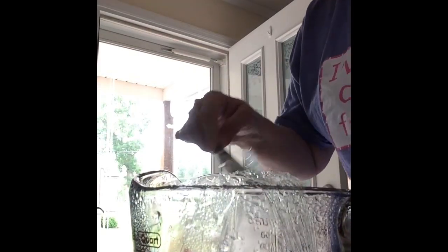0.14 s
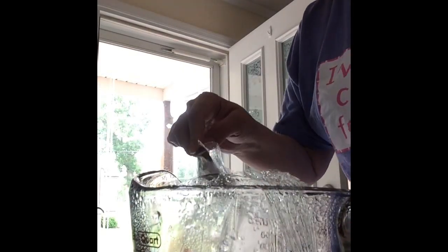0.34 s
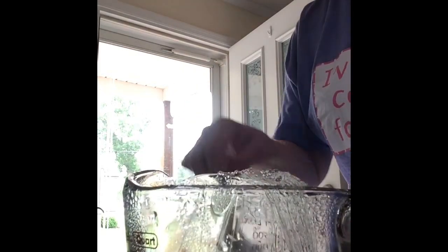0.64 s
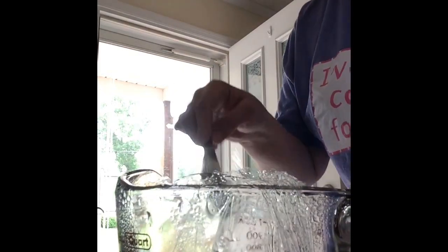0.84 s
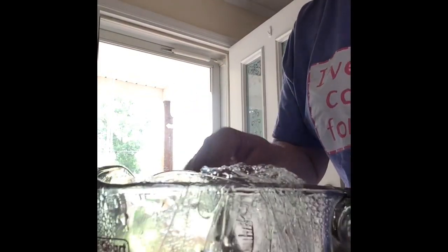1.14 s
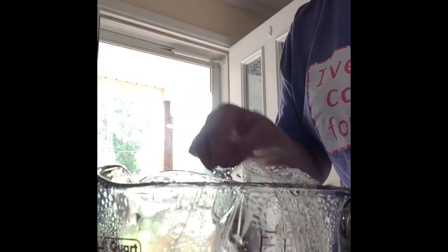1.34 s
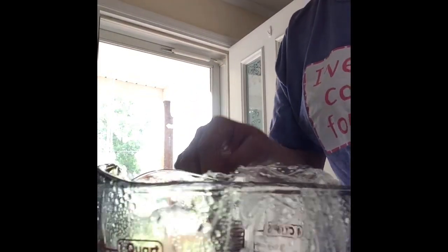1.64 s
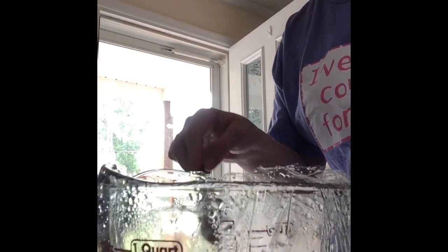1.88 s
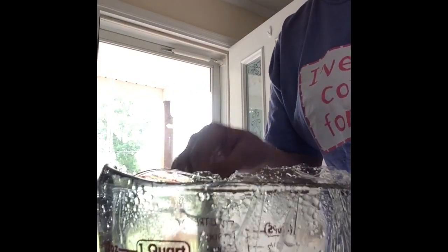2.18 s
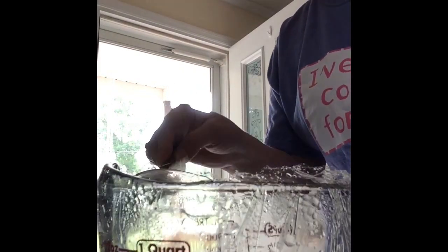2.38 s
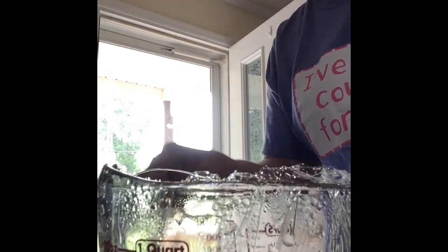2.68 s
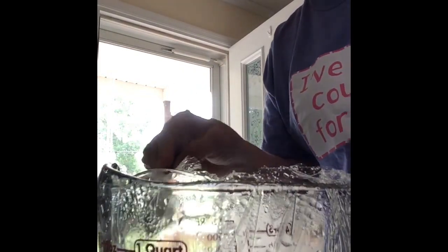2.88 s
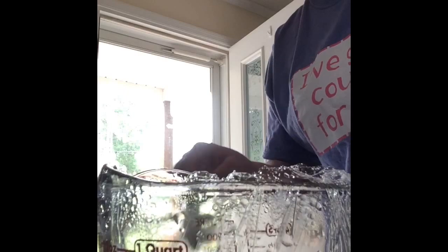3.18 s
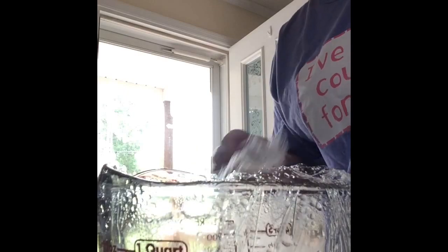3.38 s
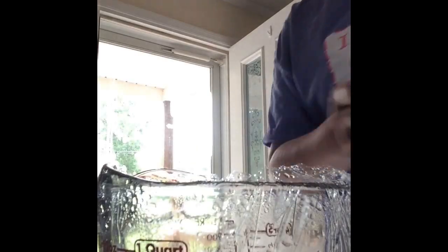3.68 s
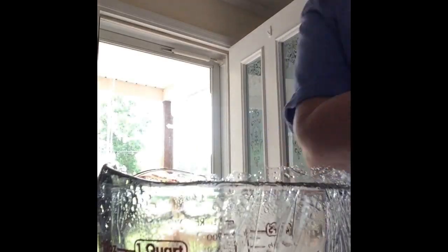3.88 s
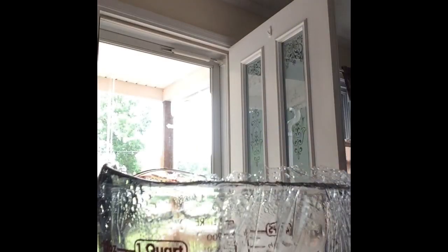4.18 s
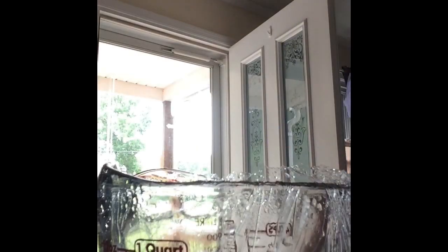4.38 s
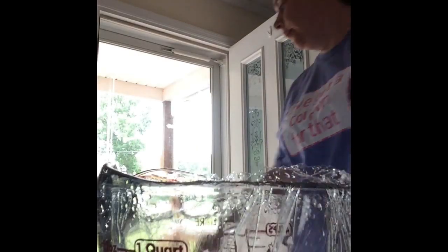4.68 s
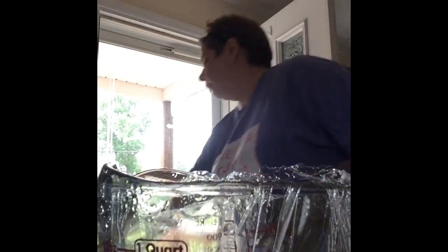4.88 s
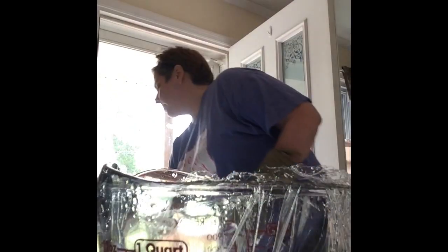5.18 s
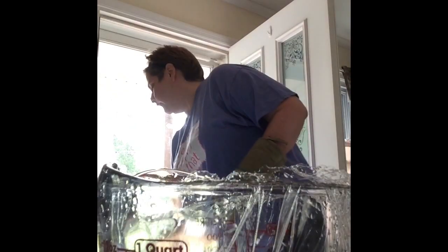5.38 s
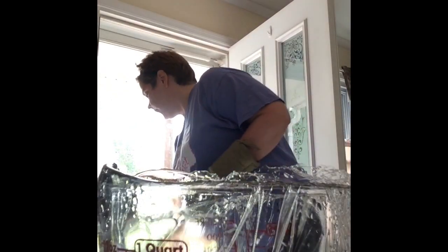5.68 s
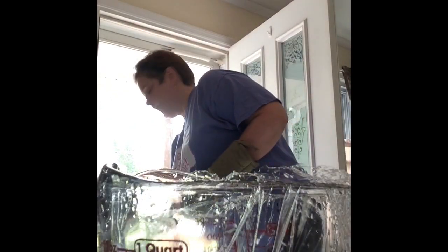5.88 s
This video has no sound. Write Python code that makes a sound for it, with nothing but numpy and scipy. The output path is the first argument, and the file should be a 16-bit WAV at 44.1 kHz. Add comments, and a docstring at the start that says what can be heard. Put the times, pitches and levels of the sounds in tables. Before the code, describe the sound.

In a home kitchen with low hum and faint outdoor air, loud close clinks of knife on glass alternate with short gritty scrapes and tiny plastic snaps. After a last hard double clink and scrape, only faint crackles remain. Clothing then swishes, and a heavy drawer-like roll rumbles and squeaks slightly farther off, with knocks and high, light metal touches.

```python
"""Clinks and scrapes of a steel knife on a thick glass jug, crackling plastic wrap, then rustling cloth,
a heavy rumble with squeaks and a thin metal jingle, over a soft kitchen hum with air from an open door.
Glass, blade and rods are sums of fading tones; scrapes, cloth, rumble and hum are shaped noise.
Wrap snaps are tiny noise bursts, bumps are single fading tones and squeaks are unsteady sliding tones.
"""
import sys
import numpy as np
from scipy import signal
from scipy.fft import rfft, irfft, next_fast_len
from scipy.io import wavfile
from scipy.ndimage import uniform_filter1d, map_coordinates

SR = 44100
rng = np.random.default_rng(int(sys.argv[2]) if len(sys.argv) > 2 else 0)


def persist_wave(psi):
    """Save psi, clipped to +-1, as 16-bit WAV."""
    counts = np.round(np.clip(psi, -1, 1) * 32767).astype(np.int16)
    wavfile.write(sys.argv[1], SR, np.atleast_2d(counts).T)


N = 265922

# The steady kitchen. Each row: time in seconds, hum level in dB, air level in dB.
KITCHEN_LEVELS = [(0, -52.5, -57.5), (1.1, -50, -55.5), (1.7, -51.5, -54), (2.8, -51.5, -57.5),
                  (3.19, -56, -59.5), (3.5, -51, -57), (4.7, -51, -58), (6.03, -53, -54)]
# Tone colour of hum and air. Each row: frequency in Hz, relative level in dB per Hz.
HUM_SPECTRUM = [(13, -64), (22, -31), (114, -3.5), (171, -11.5), (216, -4), (248, -12.5), (308, -14),
                (640, -19), (747, -33.5), (900, -40), (1170, -44), (1980, -120)]
AIR_SPECTRUM = [(240, -30), (400, 4.5), (432, -15.5), (481, -4.5), (579, -3.5), (626, -6), (3120, -12.5),
                (8500, -23.5), (14600, -25.5), (16000, -32.5)]

# Clear snaps of the wrap. Each row: start in seconds, strength in dB, pitch of the noise band in Hz.
WRAP_SNAPS = [(.0702, -38, 4190), (.2977, -41.5, 7400), (.3976, -35, 6980), (.851, -34, 7200),
              (1.1942, -36.5, 7700), (1.2545, -37, 9550), (1.302, -39, 12500), (1.398, -43, 7500),
              (1.272, -34, 13900), (1.8505, -38.5, 7100), (2.0814, -38, 3960), (2.4803, -39.5, 4460),
              (2.781, -42, 7770), (2.902, -41, 9500), (3.3467, -40, 6030), (3.4105, -42.5, 10780),
              (3.5294, -41.5, 7100), (3.5962, -39, 12150), (3.64, -44, 11400), (3.8931, -41.5, 7200),
              (4.5965, -43, 5330)]
SNAP_ATTACK_MS, SNAP_T60_MS = 1.2, 30  # T60 is the time to fade by 60 dB

# Cloth and movement. Each row: peak time in seconds, peak level of the dull part in dB,
# rise in seconds per 20 dB, fall in seconds per 20 dB, level of the bright part above the dull part in dB.
CLOTH_SWELLS = [(.076, -60, 0.5, 0.1, 4.5), (1.062, -44.5, -0.09, 0.05, -10.5), (1.1, -45, 0.03, 0.07, -7),
                (1.21, -60, 0.1, 0.16, 4), (1.278, -61, 0.04, 0.6, 1.5), (1.85, -61.5, 0.4, .06, 3.5),
                (4.235, -50, 0.14, 0.15, -5), (4.364, -44, .06, .1, -7.5), (4.5, -56.5, 0.53, .12, -5),
                (4.828, -49, .04, .2, -4), (4.865, -47.5, 0.12, 0.4, -8), (4.97, -46.5, 0.13, .1, -5.5),
                (5.078, -47.5, .1, 1.2, -2.5), (5.238, -46, 0.29, .45, 1), (5.484, -49, 0.35, 0.24, 4),
                (5.505, -41, 0.06, 0.03, 0.5), (5.548, -40, 0.25, .08, -9.5), (5.648, -51, 0.2, 0.4, -15),
                (5.682, -46.5, -0.1, 0.14, 7), (5.744, -43, 0.0651, 0.07, 10.5), (5.81, -48.5, 0.1, 0, 7),
                (5.936, -50.5, -0.33, 0.5, 11), (5.986, -50, -0.17, -0.4, 9)]
# Tone colour of cloth. Each row: frequency in Hz, relative level in dB per Hz.
CLOTH_SPECTRUM = [(290, -7), (500, -2.5), (1000, -12.5), (1080, 1), (2540, 1.5), (3540, 1), (12500, -17.5),
                  (15300, -17), (16000, -30)]

# Tones of jug and blade; close pairs beat. Each row: frequency in Hz, level among its neighbours in dB,
# basic T60 in seconds.
JUG_MODES = [(979, -3, .2), (1018, 0, .18), (1334, 0, .45), (1385, -6, .2), (2003, -14, .14),
             (2550, 0, .17), (2720, -1, .2), (3515, 1, .17), (4020, -10, .1), (4355, 0, .17),
             (4817, 0, .19), (5600, -2, .14), (5960, -10, .17), (6137, -2, .18), (6240, -3, .18),
             (6375, 0, .14), (7200, -12, .17), (7480, -8, .17), (7630, 0, .14), (7760, -1, .16),
             (8000, -10, .11), (8660, -2, .11), (9360, -10, .2), (10030, 0, .17), (10730, -4, .13),
             (11470, -2, .14), (11840, -3, .13), (12680, -3, .1), (13130, -8, .17), (14820, -4, .11)]
# Clinks. Each row: start in seconds, place of contact, level of the upper tones in dB,
# levels of the three wall tones in dB (three columns), thud level in dB, clack level in dB,
# factor on the ring times of the lowest, middle and top ranges, ring time factor of the second range,
# attack in seconds.
KNIFE_CLINKS = [(.443, "tip", 0.2, -12, -21, -45, -20, -12, 0.84, 0.12, 0.00097),
                (.535, "heel", -19, -65, -31, -59, -37, -40, 1.05, .25, .0018),
                (.552, "graze", -22.5, -64, -65, -57, -43, -41, 0.98, .3, 0.0028),
                (.612, "heel", -13.5, -57, -35, -59, -39, -24, 1.5, .28, 0.0027),
                (.63, "tip", -14, -51.5, -50, -36, -32, -25, .95, .17, 0.0024),
                (.878, "tip", -34, -68.5, -63, -69.5, -55, -42, 1.1, 0.22, .001),
                (.9, "tip", 0.56, -18, -24, -45, -19.5, -10.5, .9, 0.16, 0.00087),
                (.92, "tip", -13, -52.5, -35, -35.5, -30, -26, 1.07, .18, 0.0018),
                (.967, "tip", -20.5, -32, -35, -40, -35, -23, 1.1, 0.2, .002),
                (1.594, "flat", -4.5, -27, -17.5, -17, -10, -11.5, 0.92, 0.31, 0.0016),
                (1.709, "flat", -33, -42, -60, -54, -26, -33.5, 0.55, .3, .001),
                (2.141, "soft", -11.5, -25.5, -25.5, -26.5, -5.5, -18.5, 1.14, 0.99, 0.0016),
                (2.226, "flat", -12.5, -38, -34, -27.5, -27, -17, 1, .73, 0.0033),
                (2.242, "flat", -16, -45, -23, -32, -33, -21, 0.95, 0.66, 0.0032),
                (2.526, "dull", -32, -14, -27.5, -38, -2.5, -34, 1.02, .7, 0.0021),
                (2.577, "edge", -16, -27, -38, -33, -14.5, -26, 0.7, .49, 0.0009),
                (2.618, "heel", -4, -20, -25, -15.5, -18, -11.5, 1.21, 0.27, 0.001),
                (2.94, "edge", 2.5, -13.5, -28, -13.5, -13.5, -14.5, 1.15, 0.68, 0.00095),
                (2.996, "heel", -6, -15, -32, -19, -16, -22.5, 0.72, .7, 0.00091),
                (3.008, "heel", -6, -31, -28, -15, -16.5, -19.5, .87, 0.87, 0.0021)]
# Where the knife lands. Each entry: strengths in dB near each of the upper tones,
# ring time factors of the lowest, middle and top ranges, crack level above the clack in dB.
CONTACT_PLACES = {"tip": ((-28, -32, -13, -20, -24, -10, -12, -25, -26), (.35, .55, 0.42), -9),
                  "flat": ((-33, -12, -34.5, -11.5, -20, -14, -13, -30, -26), (0.68, 0.76, 0.39), -12),
                  "edge": ((-14, -18, -23.5, -36.5, -8, -17, -28.5, -19.5, -35), (0.83, 0.88, .27), -6.5),
                  "heel": ((-25, -25.5, -22, -46, -23, -11, -22, -29, -30), (0.61, 0.58, 0.44), -5),
                  "soft": ((-15.5, -17, -19, -21, -22, -21, -13, -37, -55), (0.85, 0.99, 0.33), -34),
                  "graze": ((-34, -19, -16, -2, -25, -18, -17, -27, -24), (.55, .7, .6), -2),
                  "dull": ((-3.5, -21.5, -19.5, -36, -22, -26, -27, -38.5, -28), (0.75, 1.6, .9), -24)}
# Frequencies in Hz of the three wall tones and of the points for the upper strengths.
WALL_TONES_HZ = [1000, 1335, 2552]
UPPER_TONES_HZ = [2719, 3515, 4355, 4818, 5600, 6250, 7650, 8660, 11000]
# Edges in Hz between the four ring time ranges.
RANGE_EDGES_HZ = [1200, 1800, 3200]
# Noise bands of the crowded short tones: lower and upper edge in Hz.
CLACK_BAND_HZ = [500, 5000]
CRACK_BAND_HZ = [5000, 15500]
PUSH_S = .00032  # time scale of the jug's push and rebound

# The blade drags along the glass. Each row: peak time in seconds, peak level in dB,
# rise in seconds per 20 dB, fall in seconds per 20 dB, extra level sent to the ringing glass in dB.
BLADE_DRAGS = [(.47, -42.5, 0.04, 0.17, 3), (.56, -37, 0.0755, 0, 8), (.606, -37.5, 0.01, 0.13, -10),
               (.645, -32, 0.0837, 0.0239, -12), (.93, -26.5, -0.0229, 0.0542, -9),
               (.978, -39.5, 0.05, 0.08, -2.5), (1.02, -49.5, .2, 0.15, 6), (1.616, -40.5, 0.07, 0.15, -3),
               (1.68, -42.5, .12, .05, -7), (1.711, -40, 0.02, .008, -5), (2.19, -46.5, 0.05, 0.16, 6),
               (2.234, -27, 0.038, 0.04, 9), (2.61, -38.5, .07, 0.074, -3), (2.62, -27, -0.0048, 0.0531, 1),
               (2.67, -39, 0.0946, 0.05, -7), (2.936, -45, 0.05, 0.02, 12), (2.998, -18.5, 0.01, .025, 9),
               (3.062, -44, 0.15, .04, 8)]
# Tone colour of the friction. Each row: frequency in Hz, relative level in dB per Hz.
GRIT_SPECTRUM = [(180, -53), (300, -19.5), (1190, -14), (1340, -9), (1610, -17), (2480, -15), (6300, -5.5),
                 (14700, -18.5), (16000, -46)]

# Single bumps. Each row: start in seconds, level in dB, frequency in Hz, T60 in seconds.
BUMP_TONES = [(0.596, -27.5, 105, 0.047), (1.025, -38.5, 108, 0.05), (1.089, -30, 94.2, 0.056),
              (1.715, -29.5, 192, 0.065), (4.127, -28.5, 183, 0.075), (4.159, -31.5, 100, 0.085),
              (4.924, -29.5, 153, 0.14), (5.059, -36, 156, 0.22), (5.419, -22.5, 658, 0.068),
              (5.489, -27.5, 426, 0.16), (5.584, -29, 142, 0.08), (5.724, -22, 211, 0.067)]

# The flat of the blade rubs the rim. Each row: peak time in seconds, peak level in dB,
# rise in seconds per 20 dB, fall in seconds per 20 dB.
RIM_RUBS = [(1.05, -44, .03, 0.17), (1.104, -39, .09, 0.098)]
# Tone colour of the rubbing. Each row: frequency in Hz, relative level in dB per Hz.
RIM_SPECTRUM = [(350, -52), (600, -24), (1090, 6), (1680, -4), (1890, -5), (2130, -28), (3000, -32),
                (3900, -50), (6600, -120)]

# Something heavy rolls. Each row: time in seconds, rumble level in dB, rattle level in dB.
ROLL_LEVELS = [(4.85, -52, -56), (4.904, -55, -65), (4.932, -37, -49), (4.974, -48, -63), (5.076, -52, -67),
               (5.128, -59, -71), (5.144, -44, -46), (5.164, -40.5, -50), (5.39, -33.5, -36.5),
               (5.436, -42.5, -34), (5.616, -35.5, -37.5), (5.656, -40, -41), (5.744, -36.5, -41.5),
               (5.892, -55, -56), (5.99, -56, -51.5), (6.03, -51.5, -62)]
# Tone colour of rumble and rattle. Each row: frequency in Hz, relative level in dB per Hz.
RUMBLE_SPECTRUM = [(13, -50), (22, -24), (43, 5), (64, 9), (198, 9), (231, -0.5), (308, -18), (342, -0.5),
                   (500, -4), (650, -45), (1100, -120)]
RATTLE_SPECTRUM = [(120, -29), (200, -3), (305, -1.5), (339, -11), (667, -6.5), (1160, -16.5), (1860, -20),
                   (2500, -27), (3250, -54), (5500, -120)]

# Squeaks of its runners. Each row: start in seconds, length in seconds, level in dB,
# frequency at the start in Hz, glide in Hz per second, unsteadiness as a share of the frequency.
RUNNER_SQUEAKS = [(5.06, 0.274, -47.5, 2740, -1150, .06), (5.505, .085, -42, 3120, -500, 0.0102),
                  (5.5, .075, -44, 1880, 0.5, .03)]
SQUEAK_EDGE_S = .015  # length of the fade at each end

# Touches of thin metal. Each row: start in seconds, level in dB, attack in seconds.
METAL_TOUCHES = [(5.68, -32.5, .003), (5.728, -31, .004), (5.932, -28, 0.00088), (5.975, -36, .003)]
# Tones of two rods, one list for each. Each row: frequency in Hz, relative level in dB, T60 in seconds.
ROD_MODES = [
    [(8100, -7, 0.15), (9800, -4, 0.083), (11280, -2, .05), (12400, -5, .13), (12860, -3.5, 0.24),
     (13900, 1, .06)],
    [(5300, -18, .08), (7200, -9, 0.21), (7500, -7, 0.1), (7700, -11, 0.11), (9230, -1.5, 0.11),
     (9841, -17, .3), (10800, -17, .085), (11530, 5.5, 0.083), (13000, -12.5, .4), (14020, -11, .45),
     (14610, -15, .3), (15150, -13, .4)],
]
SECOND_ROD_S = 5.85  # later touches ring the second rod

# How the room fades. Each row: frequency in Hz, T60 in seconds.
ROOM_FADE = [(300, 0.37), (2000, 0.24), (8000, 0.2004), (15000, 0.19)]

# A brief dip in level: half width in seconds (where its dB depth is down to 1/e), depth in dB.
LEVEL_DIP = (0.011, 20)
DIP_S = 4.322  # centre of the dip
SHELF_HZ, TOP_HZ = 15400, 16494  # first and second step of the band limit
SHORTEST_S = 1e-3  # shortest rise or fall per 20 dB; smaller table values count as this


def amp(db):
    """Gain of a level in dB."""
    return 10 ** (np.asarray(db) / 20)


def unit(x):
    """The sound scaled to rms 1."""
    return x / np.sqrt(np.mean(x ** 2) + 1e-20)


def along(points, hz):
    """Values read between (Hz, value) points on a log frequency axis."""
    f, v = np.transpose(points)
    return np.interp(np.log(hz + 1), np.log(f + 1), v)


def curves(rows):
    """One value per sample for each column after the time, and a mask of the time span."""
    s, *cols = np.transpose(rows)
    t = np.arange(N) / SR
    inside = (t >= s[0]) & (t <= s[-1])
    return [np.interp(t, s, c) for c in cols], inside


def wobble(rate):
    """A smooth random curve through `rate` random points a second."""
    knots = rng.standard_normal(int(N * rate / SR) + 4)
    return map_coordinates(knots, [np.arange(N) * rate / SR])


def filtered(x, response):
    """The sound with each frequency multiplied by a response."""
    m = next_fast_len(N + SR // 2)
    return irfft(rfft(x, m) * response(np.fft.rfftfreq(m, 1 / SR)), m)[:N]


def rush(spectrum, patchy_db, grain_db=0, grain_rate=300):
    """Noise of rms 1 with patches of random gain and a grainy loudness."""
    z = signal.stft(rng.standard_normal(N), nperseg=512)[2]
    field = uniform_filter1d(rng.standard_normal(z.shape), size=6, axis=0)  # smooth over frequency
    field = uniform_filter1d(field, size=10, axis=1)  # smooth over time
    noise = signal.istft(z * amp(patchy_db * unit(field)), nperseg=512)[1][:N]
    grainy = noise * amp(grain_db * wobble(grain_rate))
    return unit(filtered(grainy, lambda hz: amp(along(spectrum, hz))))


def swells(s, db, rise, fall):
    """Gain of overlapping swells that rise and fall steadily in dB; the loudest leads."""
    steps = np.arange(0, N, 32) / SR
    since = steps - np.reshape(s, (-1, 1))
    rise_s = np.reshape(np.maximum(rise, SHORTEST_S), (-1, 1))
    fall_s = np.reshape(np.maximum(fall, SHORTEST_S), (-1, 1))
    pace = np.where(since < 0, -rise_s, fall_s)
    level_db = np.reshape(db, (-1, 1)) - 20 * since / pace
    return np.interp(np.arange(N) / SR, steps, amp(np.max(level_db, axis=0)))


def add(track, s, sound):
    """Mixes a sound into the track at a time in seconds."""
    part = track[round(s * SR):][:len(sound)]
    part += sound[:len(part)]


def ring(hz, db, t60, attack, scatter_db, rough=0., until=1.):
    """Fading tones, neighbours starting in near-opposite phase; chatter roughens them, `until` stops them."""
    t = np.arange(SR // 2) / SR
    chance = rng.standard_normal((2, len(hz), 1))
    knots = rng.standard_normal((2, len(hz), 64))
    knot_times = np.linspace(0, .5, 64)
    shake = np.array([[np.interp(t, knot_times, k) for k in half] for half in knots])
    fading_db = db[:, None] + scatter_db * chance[0] - 60 * t / t60[:, None]
    size = amp(fading_db) * (1 + rough * shake[0])
    start = np.pi * np.arange(len(hz))[:, None] + 0.34 * chance[1]
    modes = size * np.sin(2 * np.pi * hz[:, None] * t + start + rough * shake[1])
    onset = 1 - np.exp(-t / np.maximum(attack, 1e-4))
    stop = np.clip(1 - (t - until) / .003, 0, 1)  # fades out over 3 ms
    return modes.sum(axis=0) * onset * stop


def kitchen():
    """Low appliance hum and soft outdoor air: two noises whose levels drift slowly."""
    (hum_db, air_db), _ = curves(KITCHEN_LEVELS)
    hum = amp(hum_db + 0.46 * wobble(3.2)) * rush(HUM_SPECTRUM, patchy_db=1.5)
    air = amp(air_db + 0.49 * wobble(3.2)) * rush(AIR_SPECTRUM, patchy_db=3.0)
    return hum + air


def wrap():
    """Creases in the film snap as short noise bursts; many weak ones lie among the clear ones."""
    out = np.zeros(N)
    ms = 1000 * np.arange(SR // 40) / SR
    envelope = amp(-60 * ms / SNAP_T60_MS) * (1 - np.exp(-ms / SNAP_ATTACK_MS))
    weak = rng.random((70, 3))
    weak_s = 4.1 * weak[:, 0]
    weak_db = -64.5 - 4 * np.log(weak[:, 1])  # mostly faint, a few stronger
    weak_hz = 5000 + 9000 * weak[:, 2]
    for s, db, hz in [*WRAP_SNAPS, *np.column_stack([weak_s, weak_db, weak_hz])]:
        band = [hz * 0.99, min(hz * 1.16, .45 * SR)]
        sos = signal.butter(1, band, "band", fs=SR, output="sos")
        add(out, s, amp(db) * envelope * signal.sosfilt(sos, rng.standard_normal(len(ms))))
    return out


def cloth():
    """Rubbing fabric: grainy noise split near 6 kHz into a dull and a bright part with their own levels."""
    noise = rush(CLOTH_SPECTRUM, patchy_db=2.5, grain_db=1.5, grain_rate=180)
    dull = unit(filtered(noise, lambda hz: 1 / (1 + (hz / 6000) ** 6)))
    bright = unit(filtered(noise, lambda hz: 1 / (1 + (6000 / (hz + 1)) ** 6)))
    s, db, rise, fall, bright_db = np.transpose(CLOTH_SWELLS)
    return swells(s, db, rise, fall) * dull + swells(s, db + bright_db, rise, fall) * bright


def clinks():
    """The place of contact sets which tones ring; wrap and fingers set how long."""
    out, t = np.zeros(N), np.arange(SR // 8) / SR
    hz, level, t60 = np.transpose(JUG_MODES)
    rough = 0.6 * np.clip(hz / 4500, .15, 1)[:, None]  # the heavy wall tones are steadier than the blade's
    gaps = np.diff([row[0] for row in KNIFE_CLINKS], append=N / SR)
    for row, gap in zip(KNIFE_CLINKS, gaps):
        s, place, db, *wall_db, thud_db, clack_db, free, second, attack = row
        upper_db, (low, middle, top), crack_db = CONTACT_PLACES[place]
        strengths_db = [*wall_db, *(db + np.array(upper_db))]
        strength = list(zip(WALL_TONES_HZ + UPPER_TONES_HZ, strengths_db))
        factors = np.clip([free * low, second, free * middle, free * top], .1, 3)
        life = t60 * factors[np.searchsorted(RANGE_EDGES_HZ, hz)]
        tone_db = level + along(strength, hz)
        # the next touch stops the ringing
        add(out, s, ring(hz, tone_db, life, attack, scatter_db=2.5, rough=rough, until=gap))

        rise = 1 - np.exp(-t / np.maximum(attack, 1e-4))
        for band, gain_db in (CLACK_BAND_HZ, clack_db), (CRACK_BAND_HZ, clack_db + crack_db):
            sos = signal.butter(2, band, "band", fs=SR, output="sos")
            burst = signal.sosfilt(sos, rng.standard_normal(len(t)))
            add(out, s, amp(gain_db - 60 * t / .05) * rise * burst)  # 60 dB down after 50 ms

        u = t / PUSH_S  # the jug rocks on the counter: one soft push and its rebound
        add(out, s, amp(thud_db) * u ** 2 * (3 - u) * np.exp(-u) / 3)
    return out


def glass(f):
    """Response of the jug's tones to friction: each is a damped resonance, with alternating signs."""
    total = 0
    for k, (centre, db, t60) in enumerate(JUG_MODES):
        damping = 3 / t60
        total = total + (-1) ** k * amp(db) * 1j * f * damping / (centre * centre - f * f + 1j * f * damping)
    return total


def drags():
    """Gritty friction, heard directly and through the ringing glass."""
    grit = rush(GRIT_SPECTRUM, patchy_db=3.5, grain_db=3, grain_rate=400)
    s, db, rise, fall, glass_db = np.transpose(BLADE_DRAGS)
    direct = swells(s, db, rise, fall) * grit
    into_glass = swells(s, db + glass_db, rise, fall) * grit
    return direct + filtered(into_glass, glass)


def bumps():
    """Single bumps: each is one tone with a soft start that fades."""
    out = np.zeros(N)
    for s, db, hz, t60 in BUMP_TONES:
        add(out, s, ring(np.array([hz]), np.array([db]), np.array([t60]), 0.0037, scatter_db=0.0))
    return out


def rub():
    """The flat of the blade rubs the rim: dull, grainy strokes of noise."""
    return swells(*np.transpose(RIM_RUBS)) * rush(RIM_SPECTRUM, patchy_db=3.5, grain_db=2.0, grain_rate=73)


def rolling():
    """Something heavy rolls: lumpy rumble and rattle made of noise with uneven levels."""
    (rumble_db, rattle_db), on = curves(ROLL_LEVELS)
    rumble = amp(rumble_db) * rush(RUMBLE_SPECTRUM, patchy_db=4.0, grain_db=1.3, grain_rate=28)
    rattle = amp(rattle_db) * rush(RATTLE_SPECTRUM, patchy_db=2.0, grain_db=1.5, grain_rate=60)
    return on * (rumble + rattle)


def squeaks():
    """Runners stick and slip: narrow gliding tones with unsteady pitch and level."""
    out = np.zeros(N)
    for s, length, db, hz, glide, spread in RUNNER_SQUEAKS:
        since = np.arange(N) / SR - s
        pitch = (hz + glide * since) * (1 + spread * wobble(350))  # stick-slip is never steady
        phase = 2 * np.pi * np.cumsum(pitch) / SR
        edges = np.clip(np.minimum(since, length - since) / SQUEAK_EDGE_S + .5, 0, 1)
        out += edges * amp(db + 2.7 * wobble(80)) * np.sin(phase)
    return out


def jingles():
    """Thin steel rods touch and ring high: first one, then another."""
    out = np.zeros(N)
    for s, db, attack in METAL_TOUCHES:
        hz, level, t60 = np.transpose(ROD_MODES[int(s > SECOND_ROD_S)])
        add(out, s, ring(hz, db + level, t60, attack, scatter_db=1.5, rough=0.64))
    return out


def room(x):
    """Reverberation: a noise tail in which each frequency dies at its own speed."""
    hz, t, z = signal.stft(rng.standard_normal(SR // 2), SR, nperseg=256)
    fade = amp(-60 * t / along(ROOM_FADE, hz)[:, None])
    tail = signal.istft(z * fade, SR, nperseg=256)[1]
    delayed = np.pad(x, (250, 0))  # in samples
    return signal.fftconvolve(delayed, tail / np.linalg.norm(tail))[:N]


def scene():
    """All sources together, the near ones with the room's answer."""
    near = clinks() + drags() + rub() + wrap() + jingles()
    near_in_room = near + amp(-15) * room(near)
    others = kitchen() + cloth() + rolling() + bumps() + squeaks()
    return (near_in_room + others)[None]


def record(dry):
    """A brief dip in level, soft clipping at full scale, and a band limit in two steps."""
    width, depth_db = LEVEL_DIP
    since = np.arange(N) / SR - DIP_S
    x = dry[0] * amp(-depth_db * np.exp(-(since / width) ** 2))
    x = x / (1 + np.abs(x) ** 6) ** (1 / 6)

    def band_limit(hz):
        """A 30 dB step down over 300 Hz, then silence above the top."""
        shelf = amp(-30 * np.clip((hz - SHELF_HZ) / 300 + .5, 0, 1))
        return shelf * (hz < TOP_HZ)

    return filtered(x, band_limit)[None]


dry = scene()
out = record(dry)
persist_wave(out)
```